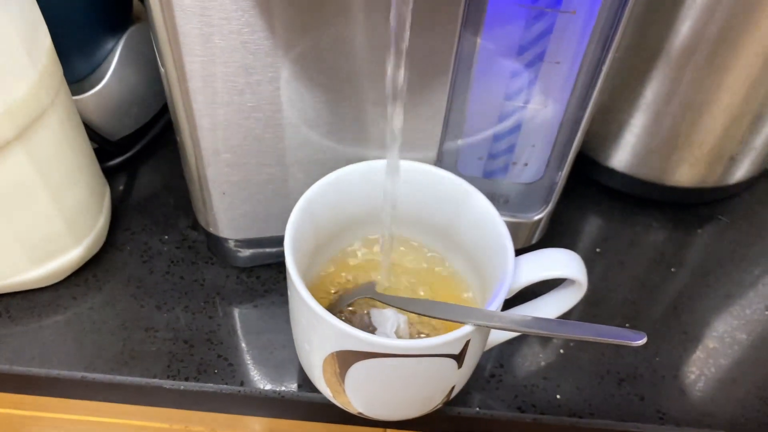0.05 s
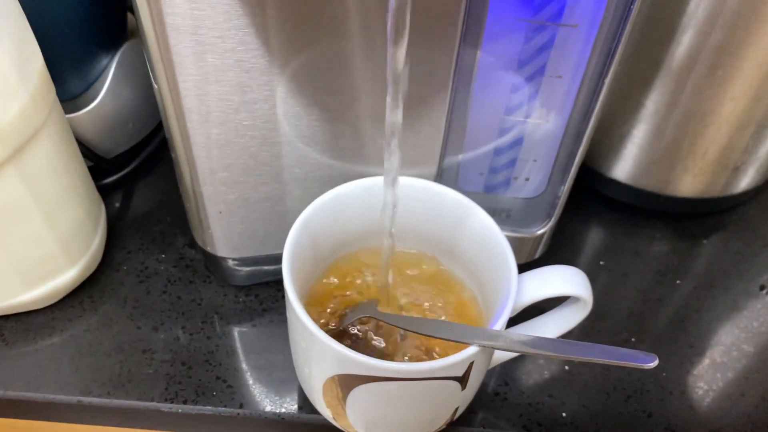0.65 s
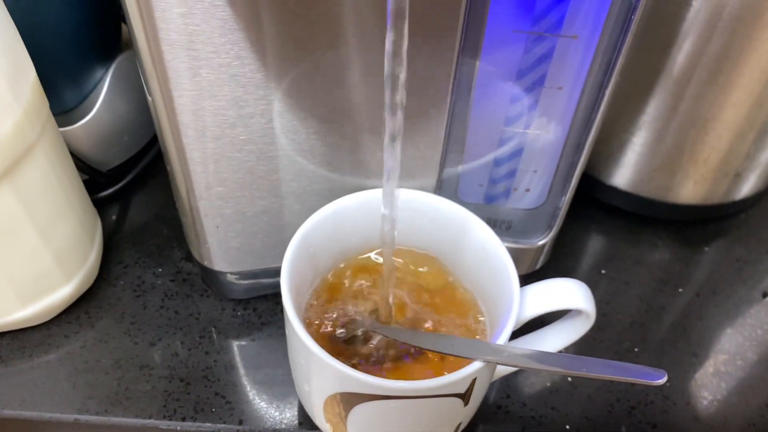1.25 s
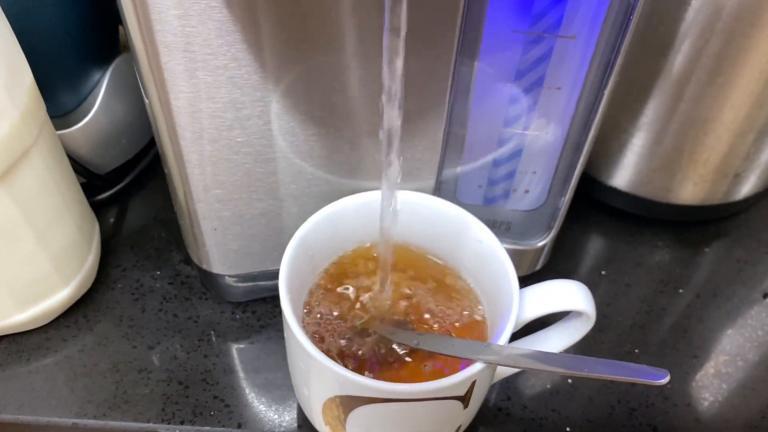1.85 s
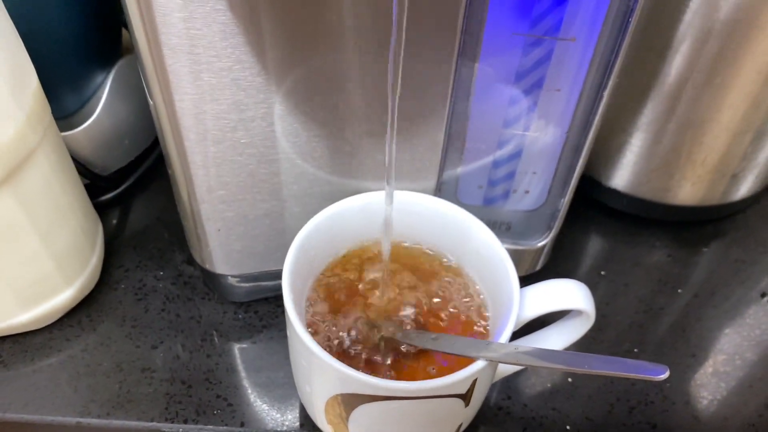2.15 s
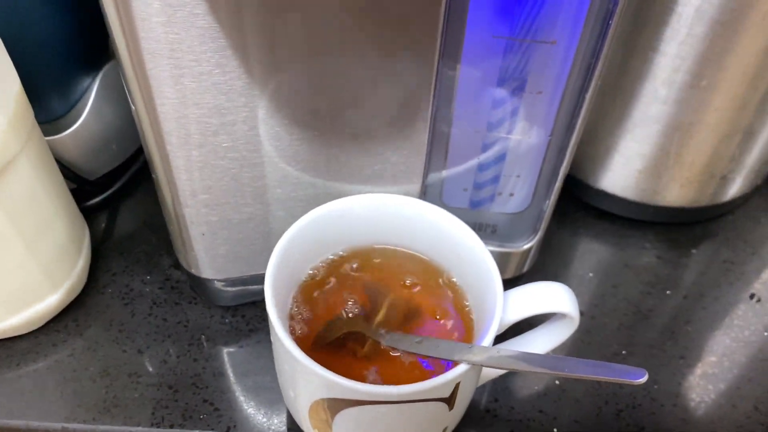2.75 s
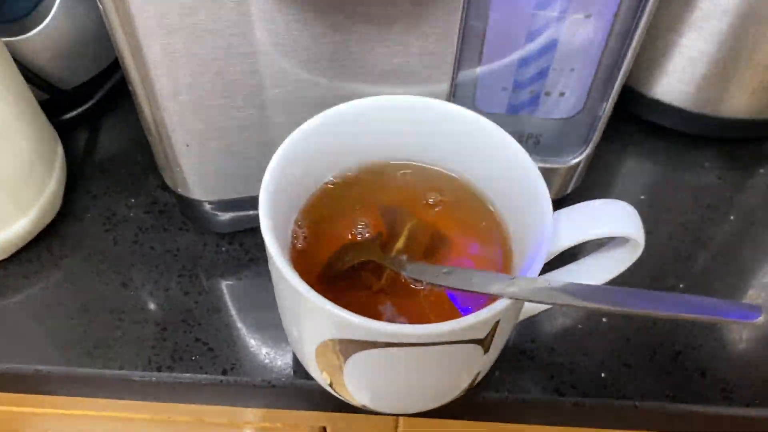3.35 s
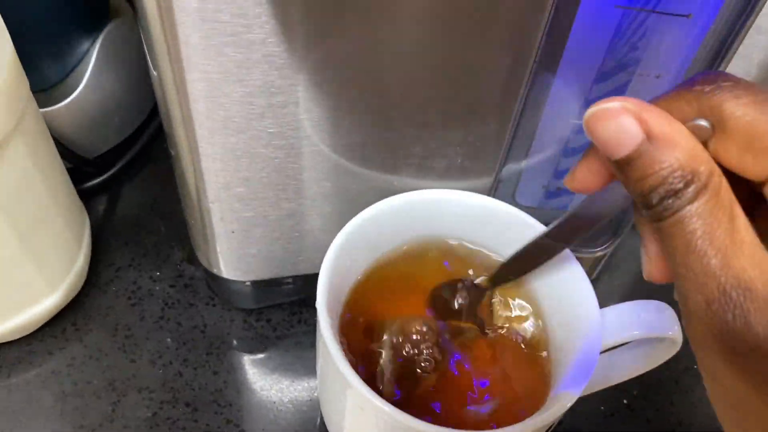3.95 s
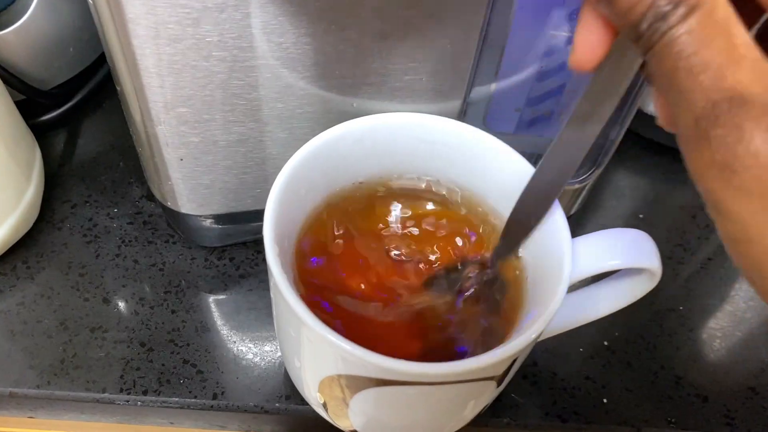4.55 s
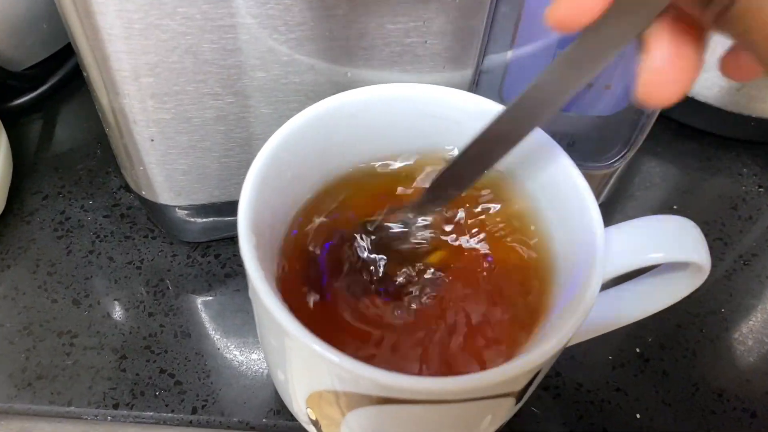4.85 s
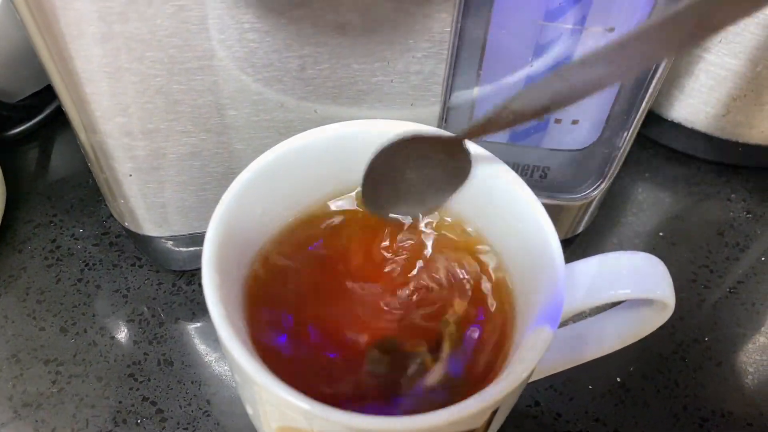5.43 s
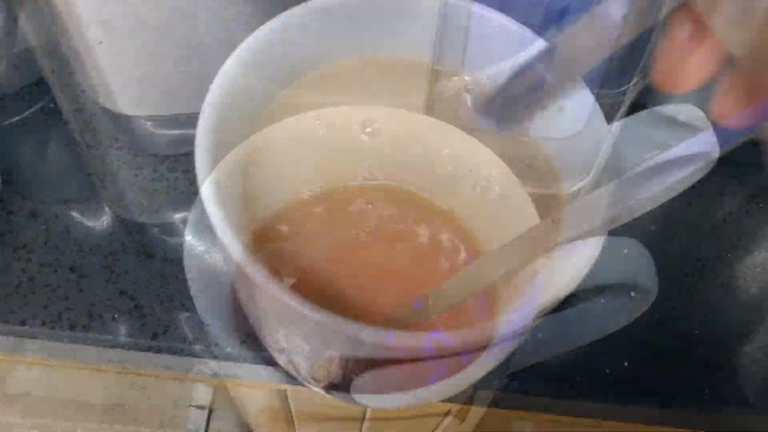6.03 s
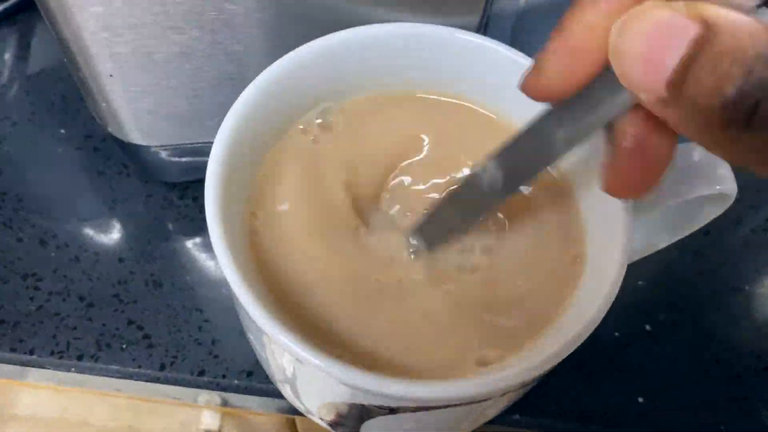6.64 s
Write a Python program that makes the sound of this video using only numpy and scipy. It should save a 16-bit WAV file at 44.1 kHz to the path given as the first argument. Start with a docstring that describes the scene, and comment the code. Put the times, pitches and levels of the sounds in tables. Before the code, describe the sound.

Hot water splashes into a ceramic mug over a buzzing pump and stops, then a steel spoon stirs, clinking and scraping.

```python
"""A thin stream of hot water, pumped from a dispenser into a ceramic mug on a kitchen counter, close up.
Its bubbles spatter, gurgle and fizz until the buzzing pump stops and the stream dribbles out.
Fingers rub and bump the hand-held stereo microphone; then a steel spoon stirs the tea, scraping and
clinking so that the mug rings. Near the end another appliance hums in behind the stirring."""
import sys
import numpy as np
from scipy import signal
from scipy.fft import rfft, irfft
from scipy.io import wavfile
from scipy.ndimage import uniform_filter1d

SR = 44100
rng = np.random.default_rng(int(sys.argv[2]) if len(sys.argv) > 2 else 0)


def transcribe(signal):
    """Save signal, clipped to [-1, 1], as a 16-bit WAV file at the path in sys.argv[1]."""
    frames = np.atleast_2d(signal).T
    limited = np.clip(frames, -1, 1)
    pcm = np.round(limited * 32767).astype(np.int16)
    wavfile.write(sys.argv[1], SR, pcm)


N = 295020
TIME = np.arange(N) / SR

PUMP_STOP_S, STREAM_END_S, DRIBBLE_END_S, FIZZ_END_S = 2.074, 2.325, 2.426, 3.6
SPATTER_THINS_DB_PER_S, GURGLE_THINS_DB_PER_S = 19, 51.5
WATER_PHASE_RAD = 0.63  # treble leads by this at the left microphone and lags at the right
# Water in the mug, close up: spectra of shallow and deep spatter, gurgle and fizz (f/Hz, level/dB)
SPATTER_SHALLOW = [(800, -8.5), (1200, -15), (2100, -5.5), (3400, -16.5), (4600, -31.5), (5480, -13.5),
                   (5900, -22.5), (8500, -32.5)]
SPATTER_DEEP = [(800, -3), (1200, -7.5), (2700, 5.5), (3900, -2), (4700, -12), (5800, -13), (6500, -9),
                (8500, -30.5)]
GURGLE = [(130, -5), (230, -2), (440, -6), (600, 1.5), (740, 6), (900, 0.5), (1300, -21.5)]
FIZZ = [(6000, 6.1), (8000, 1), (13000, 14), (16000, 8.1)]

def pour(fill_s=2.17):
    """The jet spatters, brighter as the mug fills; the air in the mug gurgles; fine spray fizzes."""
    surge = from_db(11.5) * dying(FAT_DROPS, fall=159.5)  # each fat drop drags air under
    spatter_gain = from_db(-29) * flow(SPATTER_THINS_DB_PER_S) * np.hypot(1, surge)
    gurgle_gain = from_db(-33.5) * flow(GURGLE_THINS_DB_PER_S)
    small = bubble_cloud(821, 15500, cycles=22.2, spread_db=4, clump_db=0.5, count=6000, size=512)
    large = bubble_cloud(194, 1315, cycles=4.2, spread_db=4, clump_db=0, count=1751, size=1400)
    fill = np.clip(TIME / fill_s, 0, 1)
    spatter = (1 - fill) * water_colour(small, SPATTER_SHALLOW) + fill * water_colour(small, SPATTER_DEEP)
    gurgle = water_colour(large, GURGLE)
    mist = stereo_noise(0) * from_db(4.7 * drift(130))
    spray = from_db(-2.5) * water_colour(small, FIZZ) + from_db(1) * water_colour(mist, FIZZ)
    return spatter_gain * spatter * panned(3.5) + gurgle_gain * gurgle * panned(-3) + foam() * spray

def bubble_cloud(low_hz, high_hz, cycles, spread_db, clump_db, count, size):
    """Bubbles of random pitch and strength ring at random times; their overall level is evened out."""
    chance, normal = rng.random((count, 2)), rng.standard_normal((count, 2))
    born = (chance[:, 0] * FIZZ_END_S * SR).astype(int)
    hz = low_hz * (high_hz / low_hz) ** chance[:, 1:]
    strength = hz * from_db(spread_db * np.minimum(normal[:, :1], 2) + clump_db * drift(110)[born, None])
    t, where = np.arange(size) / SR, (born[:, None] + np.arange(size)).ravel()
    # the higher the bubble, the more its phase differs between the microphones
    offset = np.minimum(hz / 4000, 1) * (WATER_PHASE_RAD + .3 * normal[:, 1:])
    sides = (strength * ping(t, hz, cycles / hz, 0.27 * hz / cycles, side * offset) for side in (1, -1))
    cloud = np.array([np.bincount(where, bubbles.ravel(), N) for bubbles in sides])
    power = uniform_filter1d(np.mean(cloud ** 2, axis=0), size=4000)
    return cloud / np.sqrt(np.abs(power) + power.max() / 1000)

def water_colour(cloud, spectrum):
    """Colour a cloud and give it unit rms during the pour."""
    shaped = colour(cloud, spectrum)
    return shaped / np.std(shaped[:, :2 * SR])

def flow(thinning, break_db_per_s=400):
    """Gain of the stream: it thins once the pump stops, then breaks off into a dribble."""
    stream = held(0, PUMP_STOP_S, 0, thinning) * held(0, STREAM_END_S, 0, break_db_per_s)
    dribble = from_db(-19.5) * held(0, DRIBBLE_END_S, 0, break_db_per_s)
    return lull() * np.maximum(stream, dribble)

# One early slackening at the spout (t/s, half width/s, depth/dB)
LULL = (0.25, 0.12, -6)

def lull():
    """Gain of the flow as it slackens and recovers."""
    s, width, depth_db = LULL
    return from_db(depth_db * np.exp(-((TIME - s) / width) ** 2))

def foam(build_s=0.91):
    """Gain of the fizz: it grows with the foam and outlasts the stream."""
    growth = from_db(-45 - 4.5 * np.maximum(1 - TIME / build_s, 0))
    lingering = from_db(-9) * held(0, STREAM_END_S, 0, fall=34)
    return growth * np.maximum(flow(SPATTER_THINS_DB_PER_S), lingering)

# Fat drops landing in the mug, left of centre (t/s, level/dB)
FAT_DROPS = [(0.136, -16.5), (.164, -12), (.471, -17.5), (.514, -17), (.618, -31), (.725, -12.5),
             (0.851, -12), (.879, -15), (0.909, -14.5), (1.074, -15), (1.091, -12.5), (1.114, -11.5),
             (1.128, -20.5), (1.241, -18), (1.28, -17.5), (1.325, -11.5), (1.42, -13.5), (1.472, -11.5),
             (1.512, -18), (1.647, -19), (1.68, -15.5), (1.743, -18), (1.811, -17), (1.851, -15.5),
             (2.068, -16.5), (2.153, -19.5), (2.249, -23.5), (2.319, -18)]
# Pitch of their bubbles as the mug fills and the stream dies (t/s, f/Hz)
PLINK_PITCH = [(0, 2130), (1.8, 2696), (2.32, 1740)]

def splashes(t60=0.026, rise=3.5):
    """A fat drop slaps the surface and traps one plinking bubble and a cluster of fainter ones."""
    out, t = np.zeros((2, N)), np.arange(2048) / SR
    for s, db in FAT_DROPS:
        hz = np.interp(s, *np.transpose(PLINK_PITCH))
        phase = WATER_PHASE_RAD * min(hz / 4000, 1) * np.array([[1], [-1]])
        burst = stereo_noise(-9, size=len(t)) * np.exp(-t / .002)
        slap = colour(burst, [(hz / 4, -3), (hz, 4), (2 * hz, -11), (16000, -16)])
        add(out, s, from_db(db - 1) * slap / np.abs(slap).max())
        plink = ping(t, hz, t60, rise, phase) * (1 - np.exp(-t / .0003))
        add(out, s, from_db(db - 2.5) * plink)
        for wait, octaves in rng.uniform([0, -.45], [.013, .4], (6, 2)):
            add(out, s + wait, from_db(db - 9) * ping(t, hz * 2 ** octaves, t60 * 0.75, rise, phase))
    return out * panned(3.4)

# Large bubbles down in the mug, dead centre (t/s, level/dB)
PLOPS = [(.136, -24.5), (.419, -17.5), (.443, -22), (.472, -16.5), (.593, -19.5), (.703, -19.5),
         (.848, -18), (1.128, -20.5), (1.43, -15)]

def plops(hz=686):
    """The biggest drops trap a large bubble that plops in the hollow of the mug."""
    out, t = np.zeros((2, N)), np.arange(2048) / SR
    for s, db in PLOPS:
        plop = ping(t, hz * rng.uniform(.93, 1.07), t60=0.068, rise=3.5) * (1 - np.exp(-t / .002))
        add(out, s, from_db(db) * plop)
    return out

# The dispenser's pump, by the mug (multiple of the stroke rate, level/dB)
PUMP_PARTIALS = [(2, -28), (4, -36), (6, -38.5), (7, -41.5), (8, -36), (9, -36.5), (13, -47), (17, -48.5),
                 (19, -54.5)]

def pump(stroke_hz=84.62):
    """The pump's strokes buzz while it drives the water."""
    running = from_db(-3) * lull() * held(0, PUMP_STOP_S, 0, fall=299)
    return running * tones([(k * stroke_hz, db) for k, db in PUMP_PARTIALS], waver_db=-1.5, spread=0.27)

# Spoon hits on the mug, close and left of centre
# (t/s, knock level/dB, spoon level/dB, wall level/dB, sheen level/dB, wall f/Hz)
CLINKS = [(3.7533, -39, -28, -53, -82, 4240), (3.845, -42, -20, -31, -30.5, 4190),
          (3.9124, -37.5, -23, -36, -45.5, 4170), (3.9943, -40, -17.5, -30.5, -45, 4230),
          (4.064, -38, -28, -40, -49, 4560), (4.15, -38, -20, -20, -45, 4270),
          (4.1995, -37.5, -24, -34, -53, 4120), (4.294, -28.5, -27, -29.5, -34.5, 4160),
          (4.365, -32, -34, -33.5, -37.5, 4360), (4.396, -39, -33, -29.5, -36.5, 4140),
          (4.433, -34, -39, -30, -38.5, 4290), (4.5897, -36.5, -46, -38, -44.5, 4300),
          (4.617, -31.5, -31, -21, -37, 4156), (4.7815, -41, -12.5, -28, -38, 4230),
          (4.803, -42, -22.5, -38, -54, 4170), (4.83, -32, -41, -24.5, -34, 4253),
          (4.835, -41, -11.5, -36, -53, 4380), (4.9211, -33, -13.5, -32, -32.5, 4110),
          (5.0219, -31.5, -58, -19, -33, 4156), (5.1048, -37.5, -60, -29.5, -47, 4140),
          (5.3191, -27.5, -23.5, -31, -31, 4390), (5.8496, -26.5, -22, -24.5, -34, 4280),
          (5.865, -23, -33, -30, -38, 4280), (6.0216, -20, -32, -26, -34.5, 4350),
          (6.104, -39, -41, -39, -39.5, 4000), (6.2417, -22, -26.5, -26.5, -32.5, 4300),
          (6.3065, -35, -43, -33, -37, 4200), (6.4245, -20.5, -24.5, -27, -31, 4030)]
# Knock, spoon, wall and sheen registers: centres (f/Hz) and scatter from hit to hit (share of pitch)
REGISTER_HZ = [1800, 2950, 4200, 9000]
REGISTER_DETUNE = [.05, .02, 0, .025]
# Chatter after a hard hit on the wall (wall level/dB, change per rebound/dB)
REBOUND = [(-27.5, -14.5), (-26.5, -4.5)]

def clinks(phases, contact_s=.0009, rebound_s=.0036):
    """Each hit cracks and rings the modes; where it lands decides the register; hard hits chatter."""
    out, t = np.zeros((2, N)), np.arange(6144) / SR
    contact = t / contact_s
    for s, *levels, wall_hz in CLINKS:
        hz, mode_db, t60 = mug(wall_hz)
        register_db = np.interp(np.log(hz), np.log(REGISTER_HZ), levels)
        detune = np.interp(np.log(hz), np.log(REGISTER_HZ), REGISTER_DETUNE)
        scatter_db = np.where(hz > RASP_EDGES_HZ[-1], 4, 2)
        crack_spectrum = [(1300, levels[0]), *zip(REGISTER_HZ, levels), (16000, levels[-1] + 2)]
        rebound_db = np.interp(levels[2], *np.transpose(REBOUND))
        for k in range(4 if rebound_db > REBOUND[0][1] else 1):
            chance = rng.standard_normal((3, len(hz), 1))
            strength = from_db(mode_db + register_db + scatter_db * chance[0])
            modes = strength * ping(t, hz * (1 + detune * chance[1]), t60, 0, phases + np.pi * chance[2])
            ring = modes.sum(axis=1) * (1 - np.exp(-contact ** 2))  # builds up over the contact
            burst = stereo_noise(-1.7, size=len(t)) * contact * np.exp(1 - contact)
            crack = colour(burst, crack_spectrum, size=1024)
            wait = k * rebound_s * rng.uniform(.85, 1.15)
            add(out, s + wait, from_db(k * rebound_db) * (from_db(-1.5) * ring + from_db(6) * crack))
    return out * panned(4.6)

WALL_SCRAPED_HZ = 4210
# Modes of the mug on the counter, spoon inside (f/Hz, level/dB, t60/s)
MUG_MODES = [(685, -9, 0.051), (1596, -3.5, 0.043), (2007, 2.5, 0.022), (2320, 3, 0.011), (2670, -8, 0.024),
             (2900, 6.5, 0.012), (5710, -3, 0.024), (9370, -5.5, 0.069), (10080, 7.5, 0.021),
             (11940, 14, 0.02), (12570, 13.5, 0.015), (15000, 5, 0.027)]
# The wall's bell tone: a close pair and a partner above (multiple of wall pitch, level/dB, t60/s)
WALL_RING = [(0.998, 8.5, 0.027), (1.002, -10.5, 0.17), (1.055, -5, 0.045)]

def mug(wall_hz):
    """Pitch, level and decay of all modes; the wall's pitch depends on where the spoon presses."""
    wall = [(multiple * wall_hz, db, t60) for multiple, db, t60 in WALL_RING]
    return np.transpose(MUG_MODES + wall)[:, :, None]

def mug_phases():
    """Each mode reaches the two microphones with its own phase difference, larger in the treble."""
    hz = mug(WALL_SCRAPED_HZ)[0]
    return np.minimum(hz / 6500, .6) * np.array([1, -1])[:, None, None]

# Strokes along the mug's wall, left of centre
# (t/s, length/s, spoon level/dB, wall level/dB, sizzle level/dB)
SCRAPES = [(4.074, 0.029, -46, -41, -51), (4.464, 0.039, -45.5, -55, -54), (4.565, 0.082, -46.5, -48, -52),
           (4.685, 0.064, -43, -48, -52.5), (4.966, 0.19, -44.5, -48.5, -52.5), (5.4, 0.024, -70, -53, -61),
           (5.496, 0.074, -57.5, -46, -42), (6.113, 0.35, -53, -47, -50.5), (6.486, 0.35, -47, -48.5, -40)]
# Lower edges of the scraped mode groups: spoon, wall, overtones (f/Hz)
RASP_EDGES_HZ = [2400, 3500, 7000]

def scraping(phases, catches_per_s=13):
    """Steel catches and slips on the glaze, exciting spoon, wall and overtones by turns."""
    skids = from_db(-25.5) * dying(CLINKS, fall=165)  # the spoon skids on after each hit
    strokes = sum(from_db(levels)[:, None] * held(s, s + length, rise=689, fall=489)
                  for s, length, *levels in SCRAPES)
    spoon_gain, wall_gain, sizzle_gain = np.hypot(strokes, skids)
    hz, mode_db, t60 = mug(WALL_SCRAPED_HZ)
    damped_t60 = np.minimum(t60, .03)  # the pressing spoon damps the modes
    modes = from_db(mode_db) * ping(np.arange(4096) / SR, hz, damped_t60, 0, phases)
    group = np.digitize(hz[:, 0], RASP_EDGES_HZ)
    rings = [modes[:, group == k].sum(axis=1) for k in (1, 2, 3)]
    grit = stereo_noise(-6) * from_db(5 * drift(600) + 4.5 * drift(70))
    grit += from_db(20) * (rng.random(N) < catches_per_s / SR) * rng.standard_normal(N)
    spoon, wall, overtones = [rms_one(signal.oaconvolve(grit, ring, axes=1)[:, :N]) for ring in rings]
    hiss = rms_one(colour(grit, [(4000, -16), (8500, 2.5), (11000, -7.5), (15000, 6)]))
    sizzle = from_db(-5.5 + 6 * drift(25)) * overtones + from_db(-3.5) * hiss
    return (spoon_gain * wandering(spoon) + wall_gain * wall + sizzle_gain * sizzle) * panned(4.1)

def wandering(rasp, warp_s=0.0016):
    """The rasp swerves in pitch and pressure as the point of contact slides."""
    warped = TIME + warp_s * drift(22)
    return from_db(2.5 * drift(35)) * np.array([np.interp(warped, TIME, side) for side in rasp])

# Two plips in the tea, then a low, falling knock of the spoon in the mug, dead centre
# (t/s, level/dB, f/Hz, t60/s, pitch change/share per s)
PLIPS_AND_KNOCK = [(4.018, -32.5, 893, 0.07, -0.7), (4.049, -43, 2350, .05, 35),
                   (5.862, -23, 650, 0.039, -8)]
# Sloshes in the mug: their crests (t/s, level/dB) and spectrum (f/Hz, level/dB)
SLOSHES = [(4.269, -43.5), (4.95, -53.5)]
SLOSH_SPECTRUM = [(170, -1), (230, 6), (420, -10), (1100, -24.5)]

def stirring():
    """The spoon pushes the tea round so it plips and sloshes, and gives one low, falling knock."""
    out = np.zeros((2, N))
    for s, db, hz, t60, rise in PLIPS_AND_KNOCK:
        add(out, s, from_db(db) * ping(np.arange(2048) / SR, hz, t60, rise))
    swell = sum(from_db(db) * held(s, s, rise=37, fall=37) for s, db in SLOSHES)
    churn = stereo_noise(-9) * from_db(5.3 * drift(55))
    return out + swell * rms_one(colour(churn, SLOSH_SPECTRUM))

# Fingers right on the microphone housing: rubbing (t/s, level/dB) and its spectrum (f/Hz, level/dB)
RUB_LEVEL = [(2.2, -51), (2.98, -44), (3.05, -38), (3.2, -37), (3.5, -37), (3.8, -40.5), (3.92, -42),
             (4.8, -76)]
RUB_SPECTRUM = [(30, -19), (64, -16), (95, 3.5), (160, 0), (300, -14), (500, -18.5), (1500, -36.5),
                (5000, -44.5), (15000, -53)]
# Bumps on the housing (t/s, thud level/dB, starting f/Hz, tick level/dB)
BUMPS = [(3.034, -34, 477, -61), (3.1009, -22.5, 531, -31), (3.114, -24, 197, -35.5),
         (3.421, -29.5, 250, -37), (3.48, -33, 930, -56), (3.525, -16.5, 320, -32.5),
         (3.714, -37.5, 450, -69), (3.832, -32, 486, -52)]

def handling(settle_hz=111):
    """Fingers rub on the housing; a bump is a tick and a thud whose pitch falls quickly and settles low."""
    friction = stereo_noise(-6) * from_db(3.8 * drift(60))
    out = fader(RUB_LEVEL) * rms_one(colour(friction, RUB_SPECTRUM))
    t = np.arange(4096) / SR
    for s, db, start_hz, tick_db in BUMPS:
        hz = settle_hz + (start_hz - settle_hz) * np.exp(-t / 0.00632)
        swell = t / 0.0069
        thud = from_db(db) * swell * np.exp(1 - swell) * np.sin(2 * np.pi * np.cumsum(hz) / SR)
        tap = stereo_noise(-4, size=len(t)) * np.exp(-t / .0035)
        tick = colour(tap, [(80, 33.5), (1100, 14), (2500, 6.5), (7500, -4), (15000, -24)])
        add(out, s, thud + from_db(tick_db) * tick)
    return out

# An appliance in the background: its swell (t/s, level/dB), tones and air spectrum (f/Hz, level/dB)
APPLIANCE_LEVEL = [(5.4, -69), (5.55, -25), (5.65, -8), (5.8, -1), (6.015, 7), (6.04, -5.5), (6.3, -1.5),
                   (6.69, 6.5)]
APPLIANCE_TONES = [(199.9, -39), (277.6, -44), (343.7, -31), (599.9, -48.5)]
APPLIANCE_AIR = [(70, -10.5), (130, -10.5), (280, 2), (460, -6.5), (600, -3), (820, -3), (1150, -14),
                 (2000, -18.5), (4000, -21), (16000, -42.5)]

def appliance():
    """A fan and a transformer hum over rushing air; the level fades in, dips once and swells back."""
    air = from_db(-38) * rms_one(colour(stereo_noise(-3), APPLIANCE_AIR))
    return fader(APPLIANCE_LEVEL) * (tones(APPLIANCE_TONES, waver_db=2, spread=0.035) + air)

# The quiet kitchen all round the microphone: noise spectrum and mains hum (f/Hz, level/dB)
ROOM_SPECTRUM = [(30, -25), (100, 5.5), (230, -3), (440, -19), (1130, -24.5), (16000, -39.5)]
MAINS_HUM = [(101, -55)]

def room_tone():
    """A faint low rush and mains hum lie under everything."""
    rush = from_db(-54) * rms_one(colour(stereo_noise(-1.5), ROOM_SPECTRUM))
    return rush + tones(MAINS_HUM, waver_db=2, spread=0)

def kitchen(x, t60, wet_db):
    """Counter and walls return a short diffuse tail, different at each microphone."""
    t = np.arange(SR // 2) / SR
    tail = rng.standard_normal((2, len(t))) * from_db(-60 * t / t60) * (t > .003)
    return x + from_db(wet_db) * signal.oaconvolve(x, rms_one(tail) / np.sqrt(len(t)), axes=1)[:, :N]

def ping(t, hz, t60, rise, phase=0):
    """A dying sine, for a mode, bubble or knock; its pitch glides by the share `rise` each second."""
    turn = 2 * np.pi * hz * t * (1 + rise * t / 2) + phase
    return from_db(-60 * t / t60) * np.sin(turn.astype(np.float32))

def tones(lines, waver_db, spread):
    """Lines (f/Hz, level/dB), each wavering in level; spread scatters their left-right phase."""
    out = 0
    for hz, db in lines:
        phase = rng.uniform(0, 2 * np.pi) + spread * rng.standard_normal() * np.array([[1], [-1]])
        out += np.sqrt(2) * from_db(db + waver_db * drift(13)) * np.sin(2 * np.pi * hz * TIME + phase)
    return out

def colour(x, spectrum, size=4096):
    """Minimum-phase filter through (f/Hz, level/dB) points, falling 18 dB an octave beyond the ends."""
    hz, db = np.transpose(spectrum)
    octave, points = np.log2(np.maximum(np.arange(size // 2 + 1), 1) * SR / size), np.log2(hz)
    beyond = np.maximum(points[0] - octave, 0) + np.maximum(octave - points[-1], 0)
    cepstrum = irfft(np.log(from_db(np.interp(octave, points, db) - 18 * beyond)))
    cepstrum[1:size // 2] *= 2
    cepstrum[size // 2 + 1:] = 0
    return signal.oaconvolve(x, irfft(np.exp(rfft(cepstrum)))[None], axes=1)[:, :x.shape[1]]

def fader(rows):
    """Gain through (t/s, level/dB) points, dying away outside them."""
    s, db = np.transpose(rows)
    outside = np.maximum(s[0] - TIME, 0) + np.maximum(TIME - s[-1], 0)
    return from_db(np.interp(TIME, s, db) - 60 * outside)

def held(start, end, rise, fall):
    """Gain that rises, is 1 from start to end, and falls; slopes in dB per second."""
    db = -rise * np.maximum(start - TIME, 0) - fall * np.maximum(TIME - end, 0)
    return from_db(np.maximum(db, -200))

def dying(events, fall):
    """Gain that jumps at each event (t/s, level/dB, ..) and falls in dB per second; powers add."""
    s, db = np.transpose(events)[:2]
    kicks = np.bincount((s * SR).astype(int), from_db(db) ** 2, N)
    return np.sqrt(signal.lfilter([1], [1, -from_db(-fall / SR) ** 2], kicks + 1e-20))

def drift(rate):
    """Random curve of spread near 1 that changes rate times a second."""
    knots = rng.standard_normal(8192)
    return 1.2 * np.interp(TIME * rate, np.arange(len(knots)), knots)

def stereo_noise(side_db, size=N):
    """White noise with a mid part and a side part."""
    mid, side = rng.standard_normal((2, size))
    return mid + from_db(side_db) * side * [[1], [-1]]

def panned(db):
    """Channel gains with the left louder by db."""
    return from_db(np.array([[db], [-db]]) / 2)

def add(out, s, sound):
    """Mix a short sound in at time s."""
    start = max(round(s * SR), 0)
    out[:, start:start + sound.shape[-1]] += sound[..., :N - start]

def from_db(db):
    """Decibels to gain."""
    return np.exp(np.asarray(db) * (np.log(10) / 20))

def rms_one(x):
    """Scale to unit rms."""
    return x / np.sqrt(np.mean(x ** 2) + 1e-20)

def scene():
    """At the counter: water and spoon with their reflections, over machines, handling and room tone."""
    background = room_tone()
    phases = mug_phases()
    water = kitchen(pour() + splashes() + plops(), t60=0.11, wet_db=-9.5)
    spoon = kitchen(clinks(phases) + scraping(phases) + stirring(), t60=0.14, wet_db=-10)
    return water + spoon + pump() + appliance() + handling() + background

def record(dry, cutoff_hz=16250):
    """The microphone chain rounds the peaks and cuts the top."""
    lowpass = signal.ellip(10, .3, 80, cutoff_hz, fs=SR, output="sos")
    return signal.sosfilt(lowpass, 0.85 * np.tanh(dry / 0.77))

dry = scene()
out = record(dry)
transcribe(out)
```